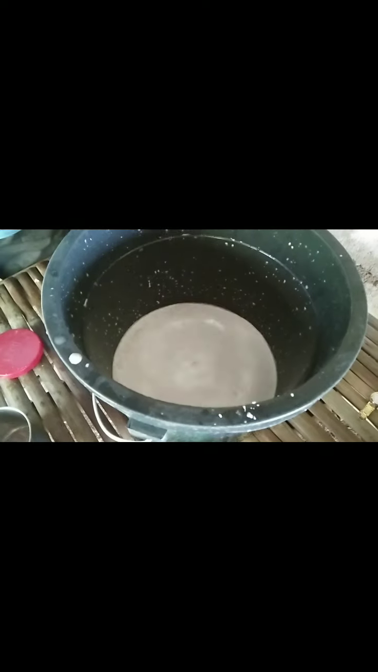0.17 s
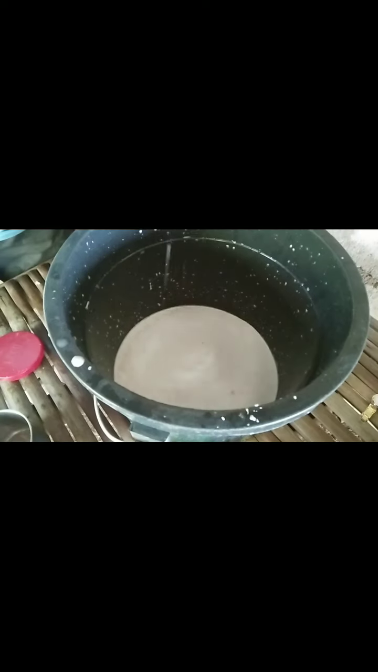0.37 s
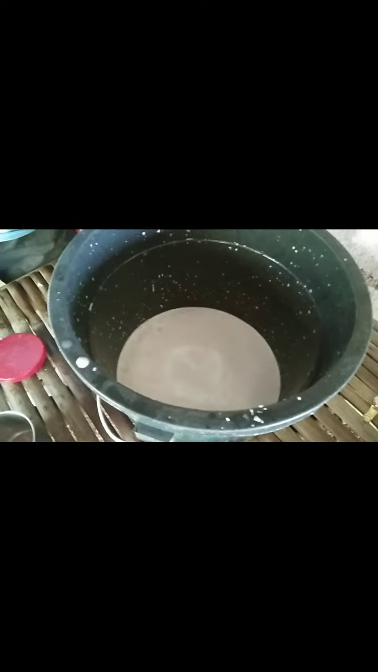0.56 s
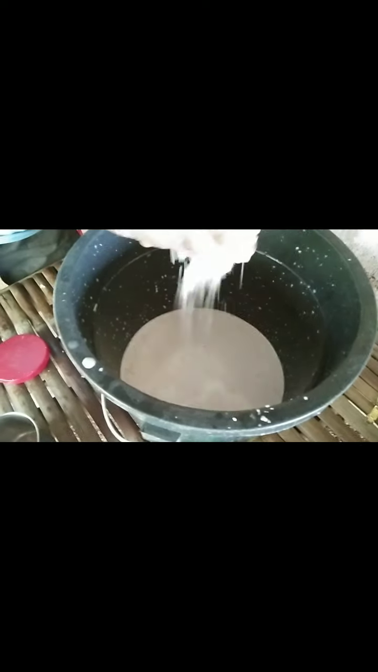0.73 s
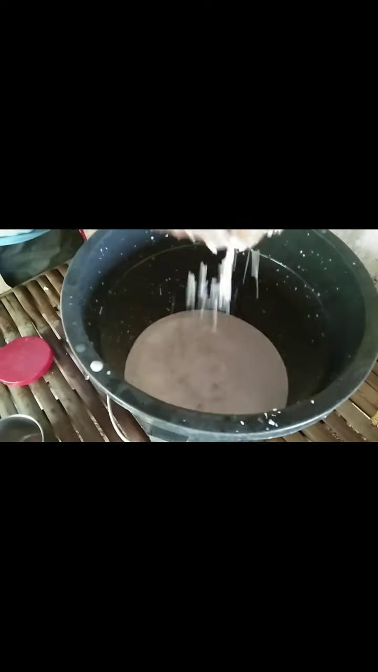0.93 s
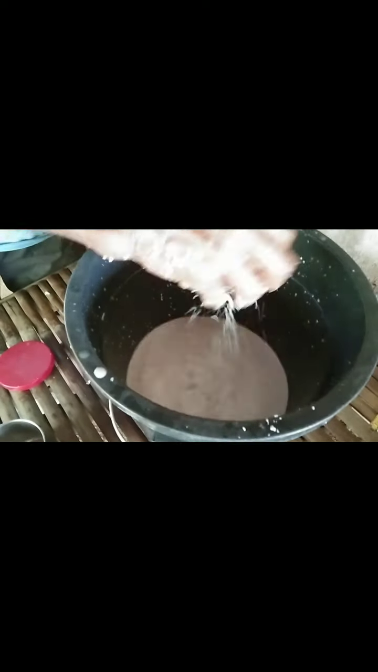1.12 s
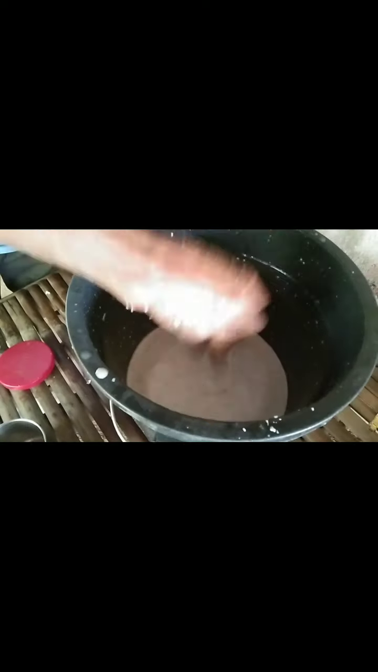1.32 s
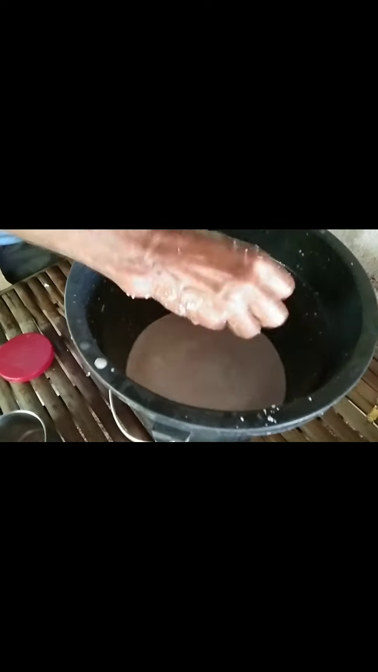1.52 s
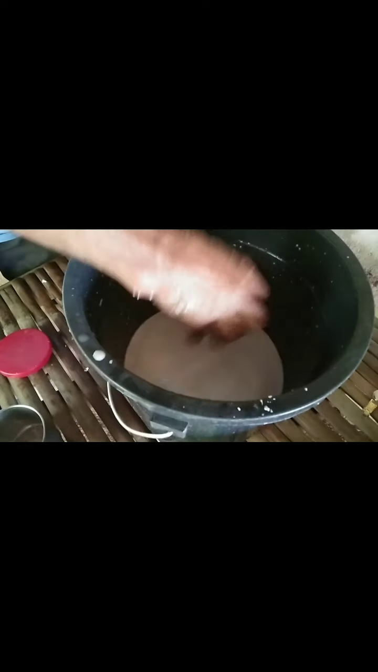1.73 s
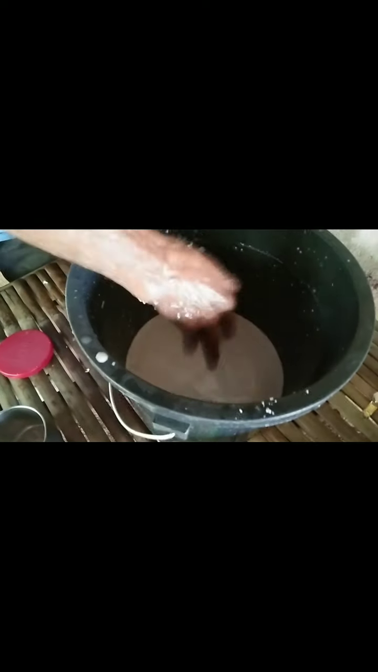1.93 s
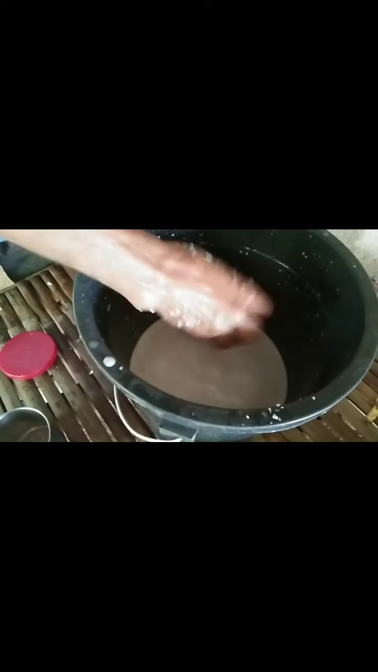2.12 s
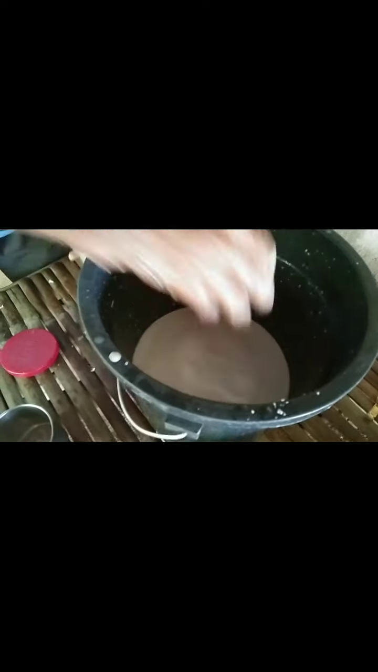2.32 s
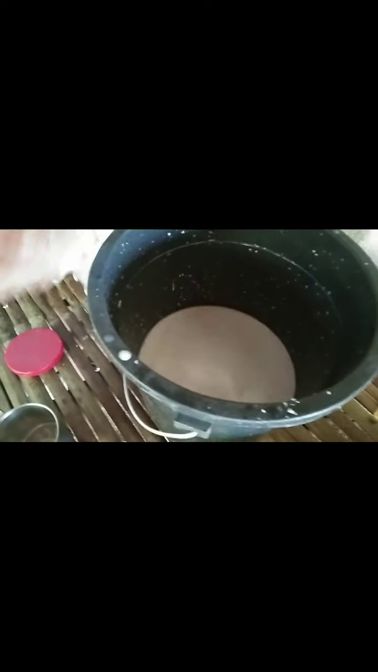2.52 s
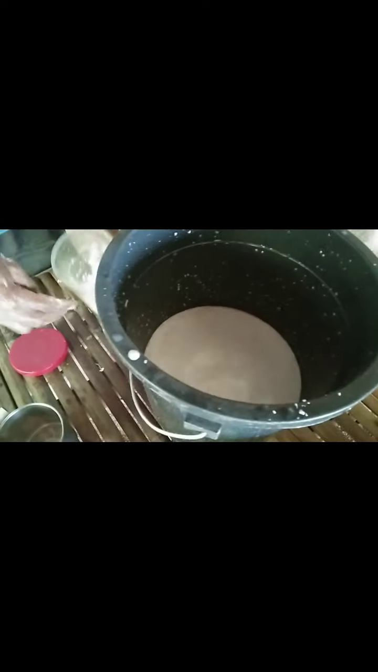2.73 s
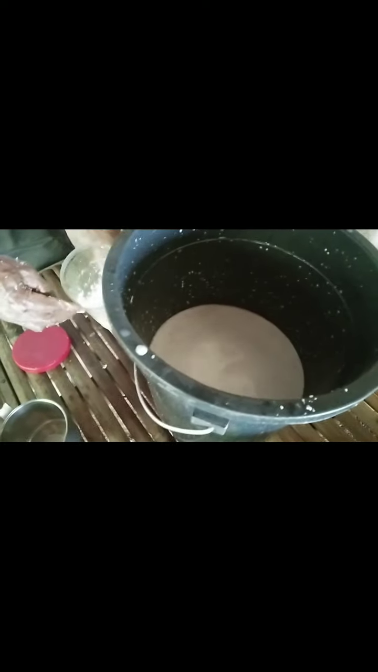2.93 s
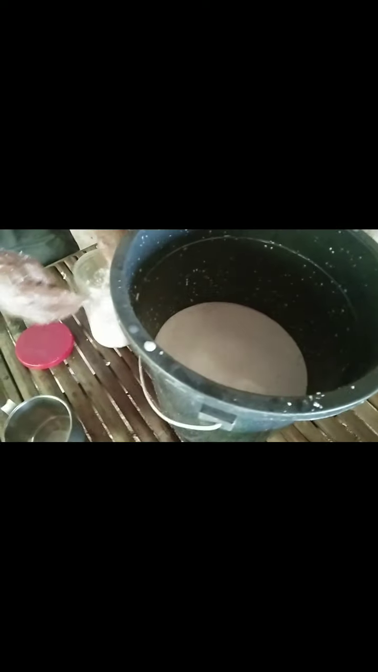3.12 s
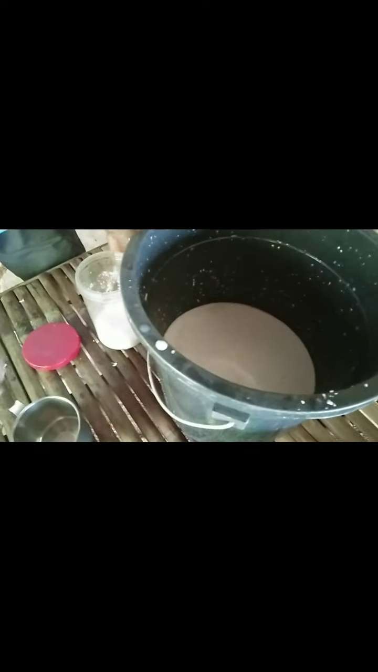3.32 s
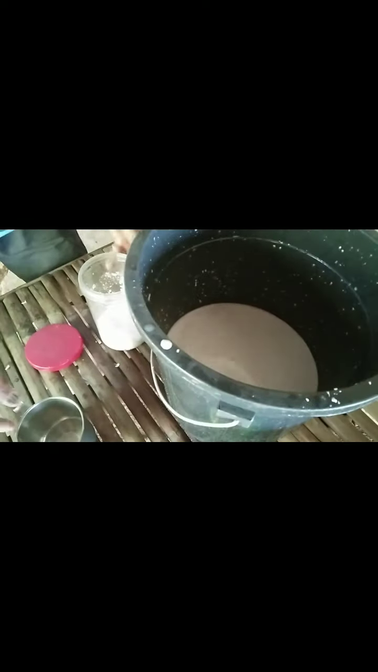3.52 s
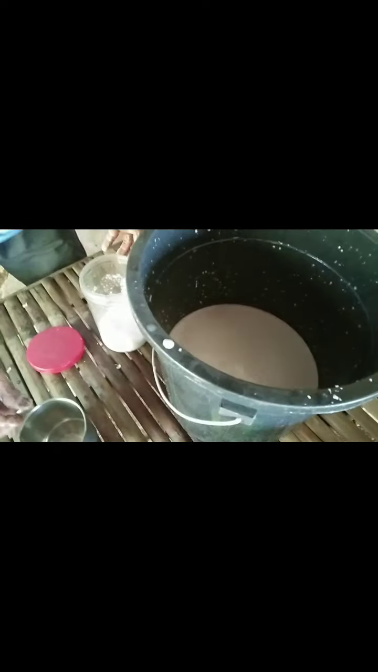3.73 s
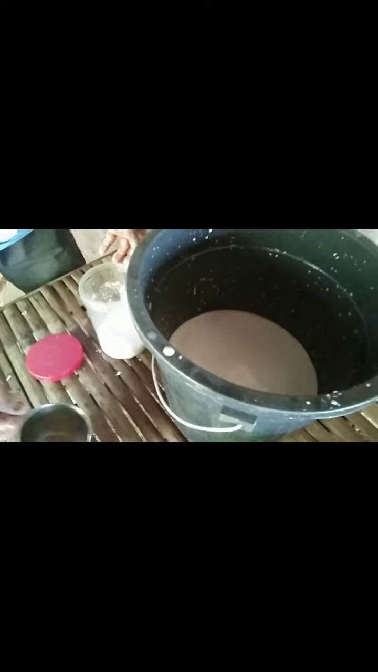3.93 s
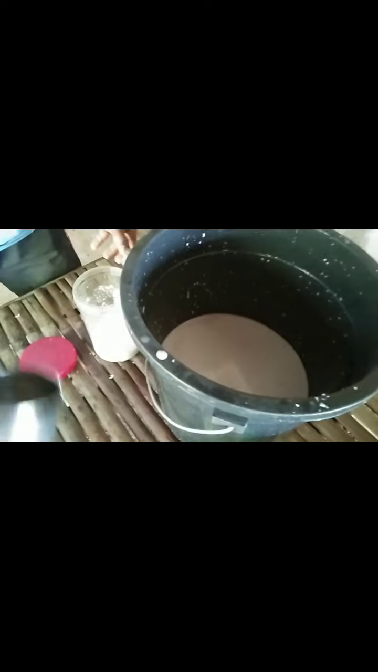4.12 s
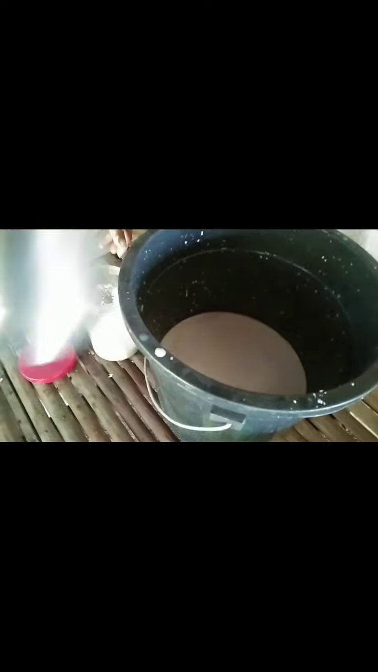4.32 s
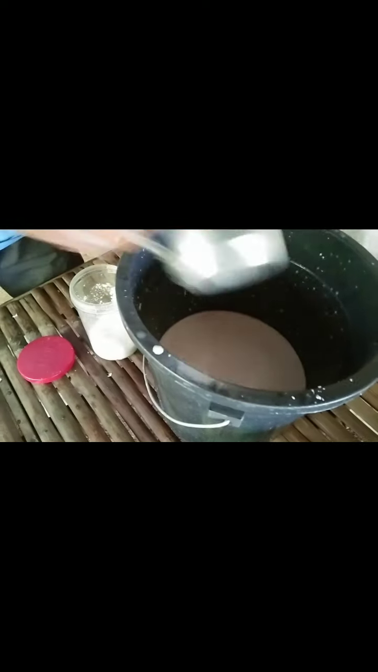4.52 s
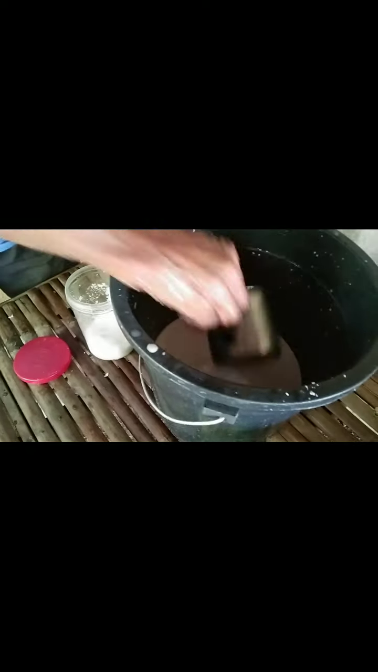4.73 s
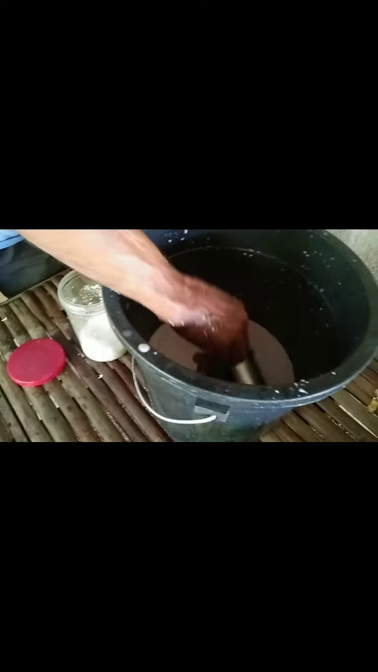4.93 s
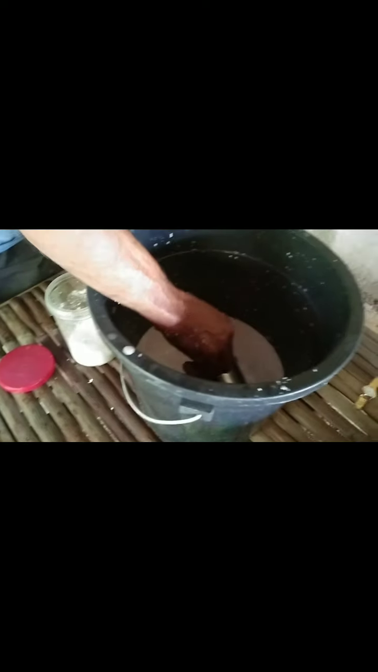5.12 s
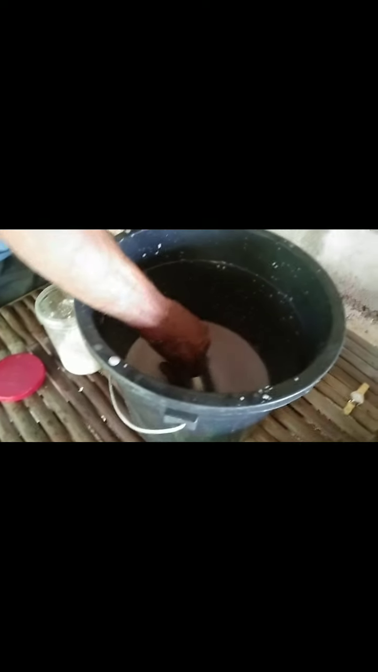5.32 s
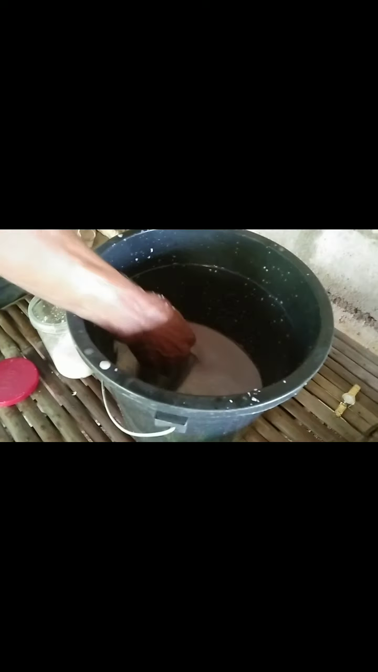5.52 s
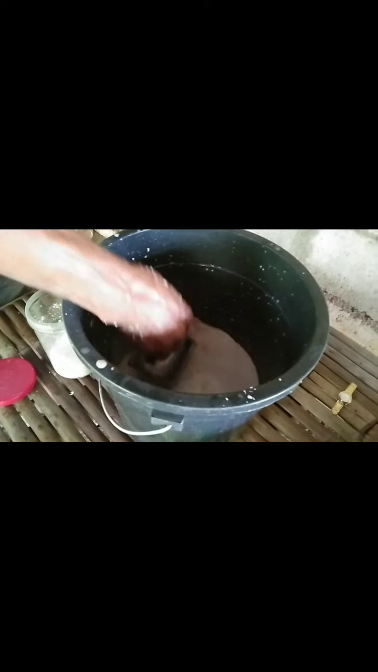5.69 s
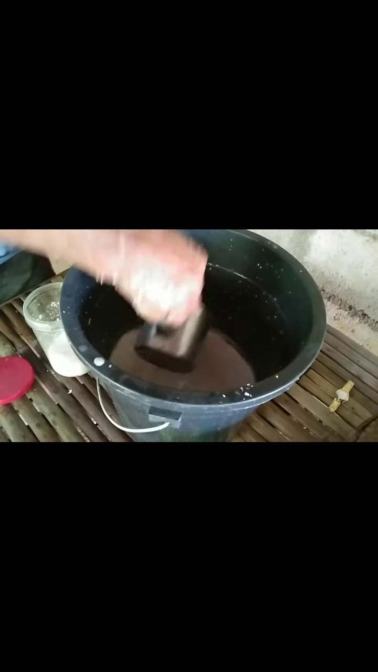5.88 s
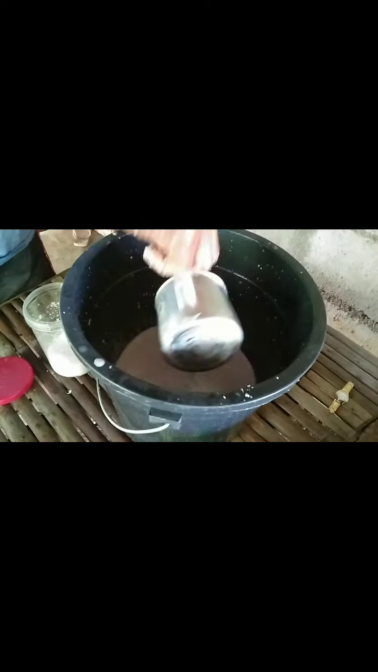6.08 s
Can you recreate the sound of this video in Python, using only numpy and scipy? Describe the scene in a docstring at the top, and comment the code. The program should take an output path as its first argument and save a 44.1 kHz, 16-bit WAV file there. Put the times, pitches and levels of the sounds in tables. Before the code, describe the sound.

Wet powder trickles into a bucket of liquid, a jar is set down with a rattle, then a steel cup stirs and sloshes the liquid.

```python
"""Throughout: a low rumble from outside and a high background hiss that dips and swells.
From 0 s, wet powder is shaken and brushed off two hands into a plastic bucket of liquid; far
roosters and two faint hoots sound. From 2.2 s, things bump on the slatted bamboo floor; at 3.2 s a
jar is set down and rattles. At 3.8 s a steel cup slides, clinks and is picked up. From 5.2 s it is
dipped and stirred: bubbles ring, foam fizzes. At 6 s it is lifted, streaming, and rings hollow."""
import sys
import numpy as np
from scipy import signal
from scipy.fft import rfft, irfft, next_fast_len
from scipy.io import wavfile
from scipy.ndimage import uniform_filter1d, map_coordinates

SR = 44100
rng = np.random.default_rng(int(sys.argv[2]) if len(sys.argv) > 2 else 0)


def unload_audio(sound):
    """Save the sound as a 16-bit wav file, at the path given as the first command line argument."""
    columns = np.transpose(np.atleast_2d(sound))
    # keep every value between -1 and 1, then stretch to whole-number steps
    steps = np.round(np.clip(columns, -1, 1) * 32767)
    wavfile.write(sys.argv[1], SR, steps.astype(np.int16))


N = 271215
TIME = np.arange(N) / SR
LOW_CUT_HZ, TOP_HZ = 48, 15800

# outdoor rumble: freq_hz, gain_db
RUMBLE_SPECTRUM = [(30, -15), (62, 5.5), (125, 1), (200, -1), (260, -12), (380, -32.5), (1500, -59),
                   (6000, -61.5)]
# high background hiss: freq_hz, gain_db
HISS_SPECTRUM = [(1000, -45.5), (2000, -19.5), (3300, -16.5), (4400, -2), (6000, -7), (7400, 5.5),
                 (9000, -26.5), (15000, -44)]
# dips and swells of the hiss: time_s, level_db
HISS_LEVELS = [(0, -60.5), (.6, -57), (.83, -74), (1.1, -60), (2.5, -65), (2.75, -60), (3.55, -70),
               (3.85, -67.5), (4.2, -62), (4.42, -75.5), (4.72, -62), (6.15, -56)]
# far hoots: start_s, length_s, pitch_hz, level_db
HOOT_CALLS = [(0.338, .16, 449, -70), (1.154, 0.167, 523, -66.5)]
# far crows: start_s, length_s, start_pitch_hz, level_db
ROOSTER_CALLS = [(0.456, 0.18, 960, -68), (0.769, 0.23, 890, -74.5), (1.183, 0.52, 862, -67.5),
                 (1.992, 0.14, 796, -68.5), (2.385, 0.48, 888, -62), (3.507, 0.28, 769.5, -63)]
# room decay: freq_hz, t60_s
ROOM_DECAY = [(100, 0.87), (1000, 0.29), (5000, 0.12), (12000, 0.14)]
# jar and slat modes: freq_hz, gain_db, t60_s
SLAT_MODES = [(464, -4, .22), (517, -8, .24), (818, -2, .14), (1234, -2, .1), (2387, -5, .18),
              (2838, -9, .2), (3564, -6, .12), (3989, 0, .07), (4081, 7, .075), (4295, -1, .14),
              (4759, -1, .14), (5313, -7, .16), (6290, 2, .14), (7200, -2, .18)]
# bumped container: freq_hz, width_hz, gain_db
CONTAINER_MODES = [(565, 16, -10), (1412, 37, -7), (2203, 20, -3), (2850, 43, -7.5), (3704, 66, -5),
                   (4100, 22, -8)]
# soft bumps on the floor: start_s, thump_db, knock_db, brush_db
FLOOR_BUMPS = [(2.228, -51.5, -53, -39.5), (2.282, -72, -57, -41), (2.54, -95, -95, -50.5),
               (2.694, -90, -54.5, -88), (2.813, -37, -53, -60), (2.838, -39.5, -46, -56),
               (3.911, -46.5, -45.5, -68.5), (4.478, -78, -51.5, -61.5), (4.498, -78, -45, -49.5),
               (4.554, -79, -72, -48.5), (4.682, -57, -55, -61)]
# cup sliding on bamboo: pitch_hz, level_db
CUP_SLIDE_TONES = [(6280, -63), (6530, -62), (9150, -67)]
# cup against the floor: start_s, level_db
CUP_CLINKS = [(3.996, -47), (4.027, -48), (4.286, -66)]
# steel cup modes: freq_hz, gain_db, t60_s
CUP_MODES = [(1400, -13, .6), (2100, -6, .5), (2600, -11, .9), (2961, -12, .5), (4818, -2, .6),
             (5954, -8, .26), (6331, -2, .25), (6912, 8, .22), (7273, 0, .25), (7973, 1, .22),
             (8230, 1, .22), (9350, -3, .2), (10600, -9, .2)]
# steel rubbing on bamboo: freq_hz, gain_db
SCRAPE_SPECTRUM = [(1000, -8.5), (2200, -14.5), (4000, -3.5), (8000, 4), (10000, -14), (14500, -18),
                   (15800, -30)]
# air in the lifted cup: start_s, length_s, pitch_hz, level_db
CUP_AIR_NOTE = (6, 0.5, 837, -45)
# jar landing and rocking: start_s, level_db, relative_thud_db, crack_hz
JAR_CONTACTS = [(3.1765, -24.5, -20, 5500), (3.1816, -7, -6.5, 6400), (3.2224, -7.5, -5, 4760),
                (3.2900, -19.5, -1, 4300), (3.3190, -17, 3, 4760), (3.3602, -37.5, -14.5, 6000),
                (3.367, -24, 1, 4450)]
# rattling slats: freq_hz, gain_db
RATTLE_SPECTRUM = [(100, -37), (450, -8.5), (630, -7.5), (850, 1), (2400, 4.5), (7000, 1.5), (9000, -14.5),
                   (15000, -37.5)]
# powder trickling or rubbed off: start_s, hold_s, level_db
POWDER_TRICKLES = [(0.11, 0.044, -51), (0.365, 0.063, -44), (0.47, 0.032, -46.5), (0.91, 0.16, -55),
                   (1.28, 0.045, -59.5), (1.5, 0.057, -57), (1.78, 0.03, -54), (2.0, 0.078, -52),
                   (2.93, 0.25, -58.5), (4.85, 0.26, -62.5)]
# finger flicks: time_s, level_db
POWDER_FLICKS = [(0.992, -36.5), (1.463, -38.5), (1.734, -37.5), (2.042, -37.5)]
# powder on liquid: freq_hz, gain_db
POWDER_SPECTRUM = [(590, -67), (1000, -49), (1600, -33), (2620, -29), (4760, -10), (7700, -7.5),
                   (11000, -22.5), (15500, -31)]
# single drops: start_s, level_db, pitch_hz
LOUD_DROPS = [(0.066, -37, 5100), (0.1355, -42, 7950), (0.4262, -31, 4850), (0.689, -36, 6280),
              (0.919, -34, 7960), (0.9494, -36.5, 3880), (0.9854, -28, 6070), (1.0206, -33.5, 6960),
              (1.3246, -32, 6350), (1.778, -46, 7800), (1.822, -44, 7370), (4.832, -34.5, 6600),
              (4.9841, -22.5, 7170), (5.4482, -30, 6540), (5.4873, -25, 5400), (5.5598, -20, 6170),
              (5.7265, -17.5, 5790), (5.8049, -25.5, 6530), (5.84, -21.5, 8000), (6.0908, -22.5, 7370),
              (6.116, -34, 3510), (6.133, -23.5, 7170)]
# large air pockets: start_s, level_db, start_pitch_hz
AIR_POCKETS = [(1.001, -46.5, 1805), (1.231, -47, 2150), (5.225, -30.5, 3265), (5.285, -29, 837),
               (5.398, -34.5, 2730), (5.445, -31.5, 335), (5.474, -35, 1140), (5.54, -33.5, 1680),
               (5.756, -35, 1127), (6.04, -33.5, 1270)]
# slops against cup and wall: start_s, level_db, droplet_hz, gurgle_db
SLOPS = [(5.394, -34, 5730, -70), (5.485, -41, 5600, -41.5), (5.534, -25.5, 4330, -38.5),
         (5.639, -29, 6060, -46), (5.728, -31, 6500, -47.5), (5.826, -29.5, 4960, -41.5),
         (5.875, -21.5, 4930, -73), (5.936, -21.5, 5250, -68), (6.041, -24, 5870, -42.5),
         (6.001, -26.5, 6240, -46), (6.115, -28, 4470, -42.5)]
# churning, easing as the cup turns: time_s, level_db
CHURN_LEVELS = [(5.15, -56.5), (5.27, -48), (5.4, -47.5), (5.55, -41), (5.7, -52.5), (5.8, -41), (6.0, -48),
                (6.15, -50)]
# churned bubbles: freq_hz, gain_db
GURGLE_SPECTRUM = [(200, -7.5), (400, -22), (600, -9.5), (850, -1.5), (1400, 2), (2400, 4.5), (4000, -14.5)]
# foam and brushing friction: freq_hz, gain_db
FIZZ_SPECTRUM = [(1180, -14.5), (2000, -1), (2700, 0.5), (3460, 3), (7480, 9), (10700, -11), (15500, -25.5)]


def amp(db):
    """Decibels to gain."""
    return 10 ** (np.asarray(db) / 20)


def unit(x):
    """Scale to rms 1."""
    return x / np.sqrt(np.mean(x ** 2) + 1e-20)


def along(points, hz):
    """Interpolate (freq_hz, value) points on a log axis."""
    freqs_hz, values = np.transpose(points)
    return np.interp(np.log(hz + 1), np.log(freqs_hz + 1), values)


def envelope(rows):
    """Gain from (time_s, level_db) rows; 20 ms ramps to silence outside them."""
    s, db = np.transpose(rows)
    gate = np.interp(TIME, [s[0] - .02, s[0], s[-1], s[-1] + .02], [0, 1, 1, 0])
    return amp(np.interp(TIME, s, db)) * gate


def swells(events, rise_s, fall_s):
    """Joint gain of (start_s, hold_s, level_db) events that swell, hold and die away."""
    t, power = TIME[::20], 0
    for s, hold_s, db in events:
        distance = np.maximum((s - t) / rise_s, (t - s - hold_s) / fall_s).clip(0, 20)
        power += (amp(db) * np.exp(-distance)) ** 2
    return np.interp(TIME, t, np.sqrt(power))


def attack(t, rise_s):
    """Exponential rise to 1."""
    return 1 - np.exp(-t / rise_s)


def fade(t, t60_s):
    """Exponential decay."""
    return np.exp(-np.log(1000) * t / t60_s)


def wobble(knots_per_s):
    """Smooth random curve."""
    return map_coordinates(rng.standard_normal(int(N * knots_per_s / SR) + 4), [TIME * knots_per_s])


def add(track, start_s, sound):
    """Mix a sound into a track."""
    part = track[max(round(start_s * SR), 0):][:len(sound)]
    part += sound[:len(part)]


def filtered(x, response):
    """Apply a frequency response."""
    size = next_fast_len(len(x) + 8192)
    return irfft(rfft(x, size) * response(np.fft.rfftfreq(size, 1 / SR)), size)[:len(x)]


def coloured(x, spectrum):
    """Shape by (freq_hz, gain_db) points; rms 1."""
    return unit(filtered(x, lambda hz: amp(along(spectrum, hz))))


def noise(t, spectrum):
    """Coloured noise as long as t; rms 1."""
    return coloured(rng.standard_normal(len(t)), spectrum)


def band(t, hz, width):
    """Noise band of relative width around hz; rms 1."""
    response = lambda f: 1 / (1 + (np.log((f + 1) / hz) / width) ** 4)
    return unit(filtered(rng.standard_normal(len(t)), response))


def patchy(spectrum, depth_db):
    """Noise whose gain wanders in time and frequency; rms 1."""
    bins = signal.stft(rng.standard_normal(N), nperseg=512)[2]
    patches = uniform_filter1d(rng.standard_normal(bins.shape), size=4, axis=0)
    patches = uniform_filter1d(patches, size=18, axis=1)
    mottled = signal.istft(bins * amp(depth_db * unit(patches)), nperseg=512)[1]
    return coloured(mottled[:N], spectrum)


def note(start_s, length_s, hz, db, flutter, sag_hz_per_s=0):
    """Tone that swells and fades, with relative pitch flutter."""
    out, t = np.zeros(N), TIME[:int(length_s * SR)]
    pitch_hz = (hz - sag_hz_per_s * t) * (1 + flutter * wobble(160)[:len(t)])
    phase = 2 * np.pi * np.cumsum(pitch_hz) / SR
    add(out, start_s, amp(db) * np.sin(np.pi * t / length_s) * np.sin(phase))
    return out


def echo(x, decay, delay_s):
    """Diffuse tail of energy 1; decay lists (freq_hz, t60_s)."""
    hz, t, bins = signal.stft(rng.standard_normal(SR // 2), SR, nperseg=128)
    tail = signal.istft(bins * fade(t, along(decay, hz)[:, None]), SR, nperseg=128)[1]
    return signal.fftconvolve(np.pad(x, (int(delay_s * SR), 0)), tail / np.linalg.norm(tail))[:N]


def background_hiss():
    """High background hiss that dips and swells."""
    return amp(-2 + 1.2 * wobble(9)) * envelope(HISS_LEVELS) * patchy(HISS_SPECTRUM, depth_db=3.5)


def outside():
    """Steady rumble, faint wavering midrange wash."""
    rumble = amp(-60.5) * noise(TIME, RUMBLE_SPECTRUM)
    wash = amp(-77) * patchy([(300, -22), (480, -8), (630, -5), (790, 9.5), (1000, -19.5),
                              (1450, -2.5), (2500, -15.5), (4000, -31.5)], depth_db=6.5)
    return rumble + wash


def hoots():
    """Two far hoots, soft and hoarse."""
    return sum(note(*hoot, flutter=.04) for hoot in HOOT_CALLS)


def roosters():
    """Far crows sag in pitch; only the root and a stronger octave carry."""
    calls = sum(note(s, length_s, k * hz, db + partial_db, flutter=.014, sag_hz_per_s=k * 130)
                for s, length_s, hz, db in ROOSTER_CALLS for k, partial_db in [(1, -9), (2, 0)])
    return calls * amp(1.2 * wobble(31))


def slats(t, cutoff_hz):
    """Modes rung by one blow; a soft contact weakens those above the cutoff."""
    ring = 0
    for hz, db, t60_s in SLAT_MODES:
        gain = amp(db) / (1 + (hz / cutoff_hz) ** 2) * rng.uniform(.62, 1)
        ring += gain * fade(t, t60_s) * np.sin(2 * np.pi * (hz * t + rng.random()))
    return ring


def bumps(hand_damping_hz=150):
    """Soft contacts: floor thump, hollow knock of a held container, brush of friction."""
    out, t = np.zeros(N), TIME[:SR // 3]
    hollow = lambda f: sum(amp(db) / (1 + (2 * (f - hz) / (width_hz + hand_damping_hz)) ** 2)
                           for hz, width_hz, db in CONTAINER_MODES)
    for s, thump_db, knock_db, brush_db in FLOOR_BUMPS:
        floor = noise(t, [(25, -32), (110, 12.5), (450, 1), (1500, -32)])
        thump = amp(thump_db - .5) * floor * fade(t, .12)
        shell = unit(filtered(rng.standard_normal(len(t)), hollow))
        shell += .76 * noise(t, [(300, -27.5), (750, 13.5), (2400, -9.5), (9000, -72)])
        knock = amp(knock_db) * (.5 * slats(t, cutoff_hz=2570) + .66 * shell * fade(t, .19))
        brush = amp(brush_db) * noise(t, FIZZ_SPECTRUM) * (fade(t, .06) + fade(t, .39) / 2)
        add(out, s, (thump + knock) * attack(t, .0092) + brush * attack(t, .0025))
    return out


def cup():
    """The steel cup sings as it slides, then clinks and scrapes off the slats."""
    out = sum(note(start_s=3.77, length_s=.12, hz=hz, db=db, flutter=.016) for hz, db in CUP_SLIDE_TONES)
    t = TIME[:SR // 2]
    chatter = lambda: .043 * np.cumsum(rng.standard_normal(len(t)))  # rubbing blurs each mode's phase
    for s, db in CUP_CLINKS:
        ring = sum(amp(mode_db) * fade(t, t60_s) * np.sin(2 * np.pi * hz * t + chatter())
                   for hz, mode_db, t60_s in CUP_MODES)
        scrape = noise(t, SCRAPE_SPECTRUM) * fade(t, .36)
        add(out, s, amp(db) * (amp(-1.5) * ring + scrape) * attack(t, .0037))
    return out


def cup_mouth():
    """Air in the lifted cup rings hollow as the liquid runs out."""
    return note(*CUP_AIR_NOTE, flutter=.03) * amp(3 * wobble(50))


def jar(contact_s=.00022):
    """Each contact cracks; the slats rattle, thud and ring."""
    out, t = np.zeros(N), TIME[:SR // 2]
    late_swell = attack(t, .0055)  # thud and rattle swell in over a few ms after the crack
    contact = 1 - np.exp(-(t / contact_s) ** 2)
    for s, db, thud_db, hz in JAR_CONTACTS:
        crack = noise(t, [(hz / 4, -14), (hz * .6, -8), (hz * 1.1, 0), (hz * 1.2, -1),
                          (9000, -15), (TOP_HZ, -40)]) * fade(t, .016)
        rattle = amp(-9) * noise(t, RATTLE_SPECTRUM) * (fade(t, .088) + amp(-23.5) * fade(t, .42))
        floor = noise(t, [(25, -38), (120, 2), (260, -3.5), (330, -6.5), (470, 3.5), (630, -10),
                          (850, -2.5), (2500, -7.5), (6000, -43)])
        thud = amp(thud_db - 13.5) * floor * fade(t, .11)
        ring = amp(-20) * slats(t, cutoff_hz=12100)
        add(out, s, amp(db) * contact * (crack + ring + (rattle + thud) * late_swell))
    return out


def bubble(hz, life_s, climb):
    """Ringing air pocket; nearing the surface, its pitch rises by the share climb per life."""
    age = np.arange(int(7 * life_s * SR) + 2) / (life_s * SR)
    phase = 2 * np.pi * hz * life_s * (age + climb * age * age / 2)
    return 2 * (1 - np.exp(-3 * age)) * np.exp(-age) * np.sin(phase)


def shower(flow, per_s, hz, spread, cycles, scatter_db):
    """Tiny bubbles of random pitch and size; rms 1 where the flow is active."""
    out, active = np.zeros(N), flow > flow.max() / 20
    draws = rng.random((int(per_s * N / SR), 3))
    for when, pitch, size in draws[active[(draws[:, 0] * N).astype(int)]]:
        pitch_hz = min(hz * np.exp(spread * (2 * pitch - 1)), TOP_HZ)
        level_db = scatter_db * min(-np.log(1 - size), 3)
        add(out, when * N / SR, amp(level_db) * bubble(pitch_hz, cycles / pitch_hz, climb=.039))
    return unit(out) * np.sqrt(active.mean())


def powder():
    """Fine grains hiss onto the liquid in trickles and flicks; wet crumbs patter."""
    flicks = [(s, 0, db) for s, db in POWDER_FLICKS]
    dust = amp(-12.5) * swells(flicks, rise_s=.012, fall_s=.015)
    loose = np.hypot(swells(POWDER_TRICKLES, rise_s=.022, fall_s=.063), dust)
    flow = np.hypot(loose, swells(flicks, rise_s=.0098, fall_s=.0057))
    grains = shower(flow, per_s=1500, hz=6080, spread=.99, cycles=1.8, scatter_db=6.5)
    hiss = coloured(grains + rng.standard_normal(N), POWDER_SPECTRUM)
    crumbs = shower(loose, per_s=80, hz=6300, spread=.35, cycles=4, scatter_db=3)
    return amp(-3.5) * flow * hiss + amp(-11) * loose * crumbs


def drops():
    """Each drop ticks on the surface and leaves a ringing bubble."""
    out, t = np.zeros(N), TIME[:SR // 50]
    for s, db, hz in LOUD_DROPS:
        add(out, s, amp(db + 1) * bubble(hz, life_s=5 / hz, climb=.021))
        add(out, s, amp(db - 6.5) * band(t, hz, width=.26) * fade(t, .035) * attack(t, .00096))
    return out


def glugs():
    """Escaping air rings, then breaks into a burble; larger pockets ring longer and climb further."""
    out, t = np.zeros(N), TIME[:SR // 5]
    for s, db, hz in AIR_POCKETS:
        size = 1014 / hz  # 1 for a middling pocket
        life_s = .0059 * size ** .37
        add(out, s, amp(db - 1.5) * bubble(hz, life_s, climb=.055 * size ** 1.3))
        age = t / (1.7 * life_s)
        burble = band(t, 1.17 * hz, width=.23) * age * np.exp(-age)
        add(out, s, amp(db - 8) * burble)
    return out


def splashes(count=12, length_s=.016, cycles=3.07):
    """Each slop breaks into a quick cluster of droplets, weaker toward the end."""
    out = np.zeros(N)
    for s, db, hz, _ in SLOPS:
        for k, (late, pitch, smallness) in enumerate(rng.random((count, 3))):
            age = (k + late) / count
            pitch_hz = hz * np.exp(.55 * (2 * pitch - 1))
            level_db = db + 3.5 - 9.5 * smallness - 7.5 * age
            add(out, s + length_s * age, amp(level_db) * bubble(pitch_hz, cycles / pitch_hz, climb=.048))
    return out


def stirring():
    """Churned liquid: bubbles gurgle, droplets sparkle, foam fizzes; all surge with each slop."""
    churn = envelope(CHURN_LEVELS)
    slosh = swells([(s, 0, db) for s, _, _, db in SLOPS], rise_s=.028, fall_s=.028)
    surge = swells([(s, 0, db - 12.5) for s, db, _, _ in SLOPS], rise_s=.0027, fall_s=.046)
    gurgle_gain = np.hypot(amp(-9) * churn, slosh)
    spray_gain = np.hypot(churn, surge)
    bubbles = shower(gurgle_gain, per_s=700, hz=950, spread=1.2, cycles=3, scatter_db=4.5)
    gurgle = filtered(bubbles + .4 * rng.standard_normal(N), lambda hz: amp(along(GURGLE_SPECTRUM, hz)))
    sparkle = amp(-7) * shower(spray_gain, per_s=360, hz=5600, spread=.45, cycles=4.5, scatter_db=4.5)
    foam = amp(-7.5) * patchy(FIZZ_SPECTRUM, depth_db=3)
    return gurgle_gain * gurgle + spray_gain * (sparkle + foam)


def scene():
    """Liquid echoes in the bucket; all but rumble, wash and background hiss echoes in the room."""
    liquid = powder() + drops() + splashes() + stirring()
    bucket = liquid + amp(-8) * echo(liquid, [(400, .15), (6000, .068)], delay_s=.002)
    direct = bucket + glugs() + jar() + bumps() + cup() + cup_mouth() + roosters() + hoots()
    room = amp(-13) * echo(direct, ROOM_DECAY, delay_s=.0074)
    return (direct + room + outside() + background_hiss())[None]


def record(dry):
    """Microphone: second-order low cut, hard upper band limit."""
    return filtered(dry[0], lambda hz: (hz < TOP_HZ) * (1j * hz / (LOW_CUT_HZ + 1j * hz)) ** 2)[None]


dry = scene()
out = record(dry)
unload_audio(out)
```